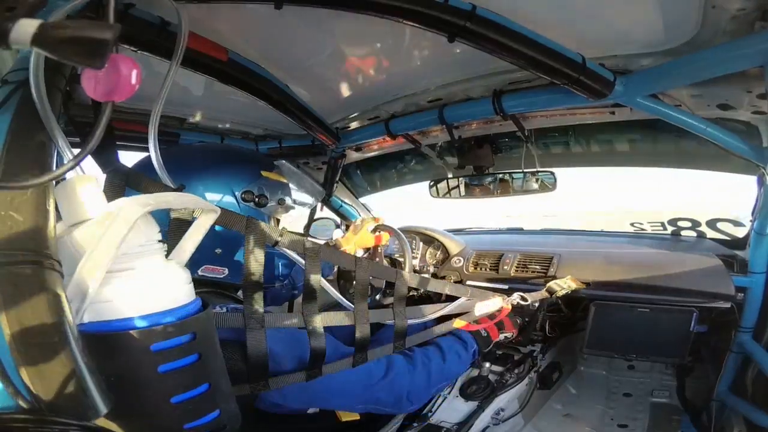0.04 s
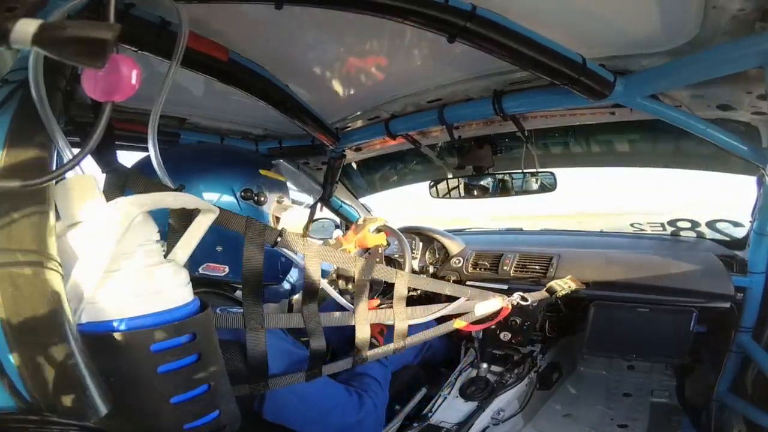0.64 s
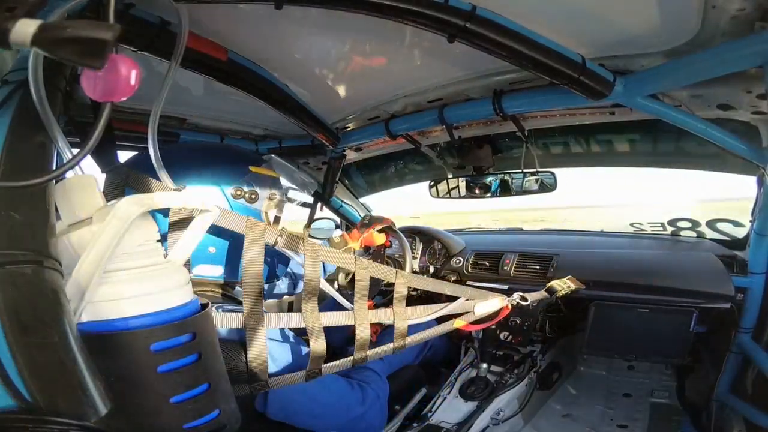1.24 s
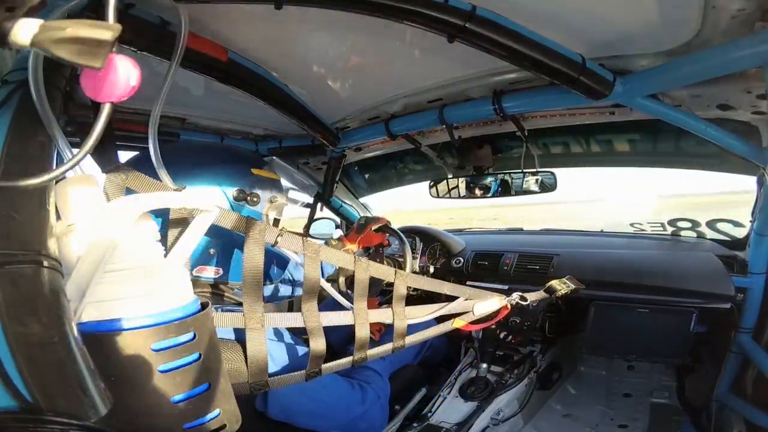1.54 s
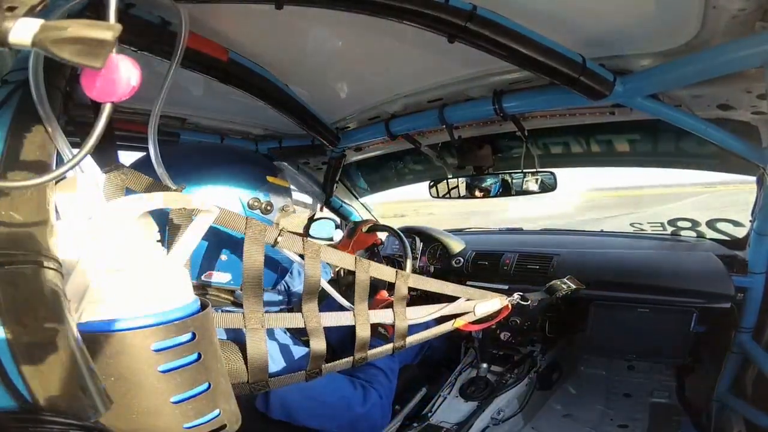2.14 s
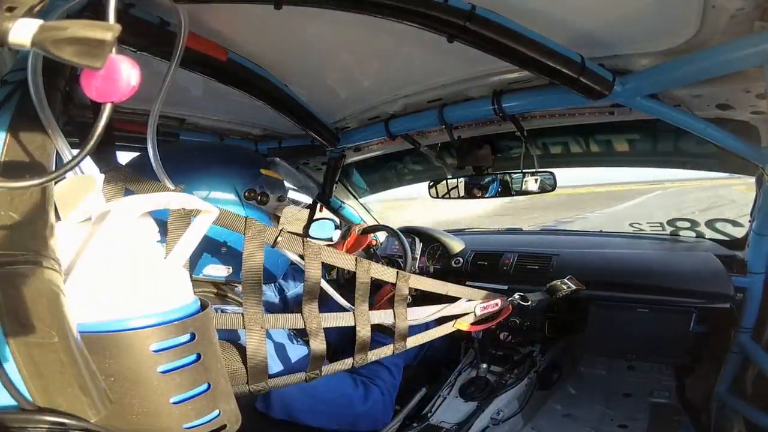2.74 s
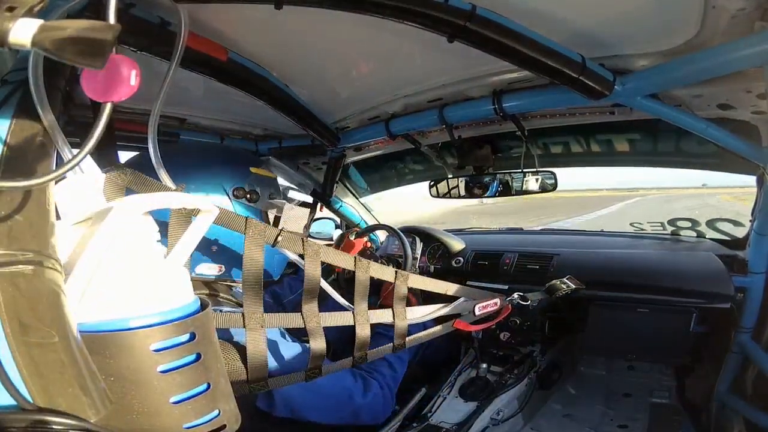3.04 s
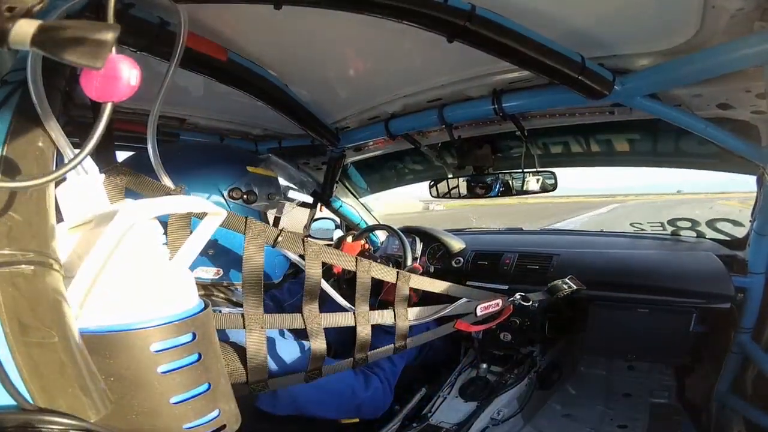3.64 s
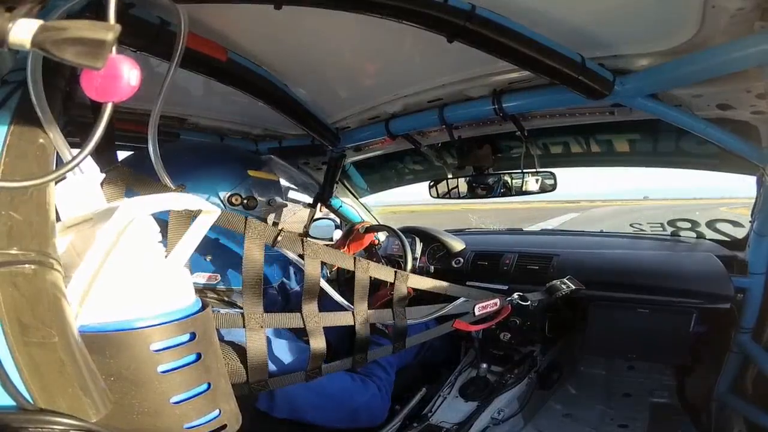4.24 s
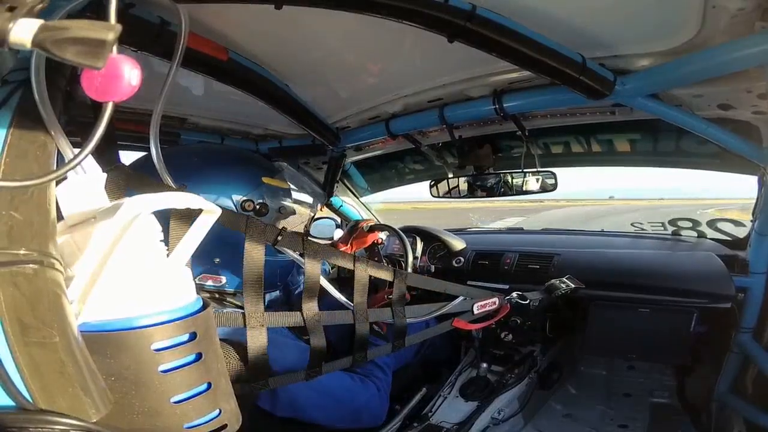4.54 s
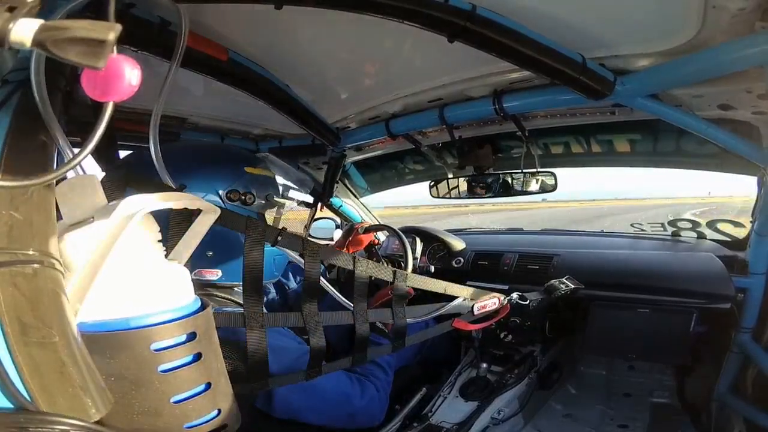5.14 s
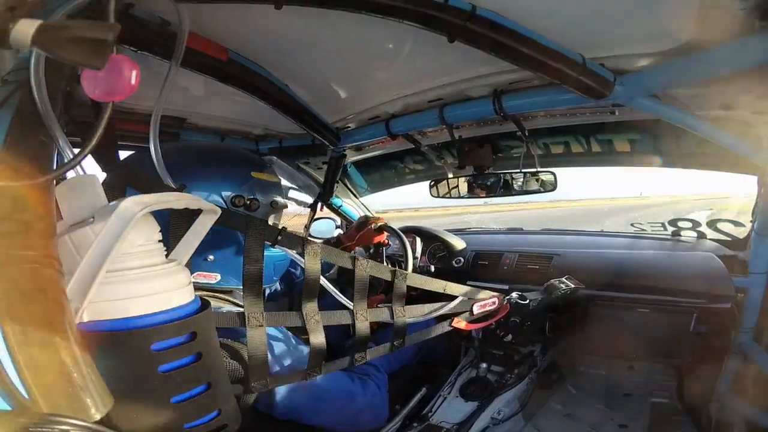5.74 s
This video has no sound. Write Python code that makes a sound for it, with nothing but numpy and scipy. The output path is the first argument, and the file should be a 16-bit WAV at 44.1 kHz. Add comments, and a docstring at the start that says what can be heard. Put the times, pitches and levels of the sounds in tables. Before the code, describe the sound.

Inside a bare race car cockpit, the engine changes up, climbs steadily and briefly eases off amid tyre and wind roar.

```python
"""A six-cylinder race engine from inside the car's bare cockpit: an upshift, a long pull, a brief lift.
Its orders swell as they climb through the resonances of the shell; late on, a low drone throbs with them.
All around are the roar of tyres and air, mechanical rasp, thin hiss and the rumble of the chassis.
At this close range the din overloads the camera's two microphones, which flatten every large wave."""
import sys
import numpy as np
from scipy import signal
from scipy.fft import rfft, irfft
from scipy.io import wavfile

SR = 44100
rng = np.random.default_rng(int(sys.argv[2]) if len(sys.argv) > 2 else 0)


def unload_audio(sound):
    """Save the sound as a 16-bit wav file, at the path given as the first command line argument."""
    columns = np.transpose(np.atleast_2d(sound))
    # keep every value between -1 and 1, then stretch to whole-number steps
    steps = np.round(np.clip(columns, -1, 1) * 32767)
    wavfile.write(sys.argv[1], SR, steps.astype(np.int16))


N = 255339
TIME = np.arange(N) / SR
BINS = np.fft.rfftfreq(N, 1 / SR)

# firing rate through the upshift, the pull and the lift: t/s, f/Hz
FIRING_RATE = [(0.0, 199.5), (0.1, 199.8), (0.2, 181.4), (0.25, 135.7), (0.35, 174.7), (0.43, 152.1),
               (0.65, 163.6), (1.12, 174.5), (1.55, 189.8), (1.8, 192.6), (2.27, 209.3), (3.4, 245),
               (4.0, 262.5), (4.3, 266.6), (4.76, 259.6), (4.95, 273), (5.15, 271.6), (5.79, 283.2)]
# driver off the throttle: start/s, end/s, change of the firing tone/dB
THROTTLE_LIFTS = [(-0.2, 0.23, -3.5), (4.344, 4.896, 10.5)]
# brief dips of the firing tone: t/s, depth/dB, half width/s
FIRING_DIPS = [(0.07, 7, 0.039), (0.216, 3, 0.0028), (0.242, 16, 0.007), (1.757, 21, 0.036)]
# cabin booms that the lowest exhaust tones climb through: f/Hz, level/dB, half width/Hz
CABIN_BOOMS = [(160, -6.5, 24), (186, -9, 9), (207, -2, 12.5), (236, -12.3, 15), (284, -16, 12),
               (343, -22, 14), (362, -14, 11), (383, -10, 11), (499, -19.5, 10), (527, -18.5, 13),
               (547, -19.5, 9), (670, -10, 16), (774, -9, 9)]
# resonances of the shell around the microphones: f/Hz, width/Hz, level/dB
SHELL_MODES = [(92.4, 12, -13), (160, 20.5, 7.5), (208.5, 37, 8), (268, 12, 11), (367.2, 85, -1.5),
               (536, 32, -3), (622, 70, -2.5), (760, 59, -4.5), (1017, 82, -13), (1353, 32, -9.5)]
# what the panels pass between resonances: f/Hz, level/dB
PANEL_GAIN = [(35, -30), (120, -31), (300, -13.5), (800, -9), (1400, -21.5), (2200, -45), (3500, -39)]
# noise spectra inside the cockpit: f/Hz, relative level/dB
ROAR_SPECTRUM = [(20, -10), (60, -13), (110, -13), (170, 7), (240, 4), (330, 5.5), (450, -1.5), (650, -1.5),
                 (900, -2.5), (1300, -8.5), (1900, -25), (3000, -24.5), (6000, -52)]
RASP_SPECTRUM = [(400, -5.5), (1200, 4), (1900, -4.5), (2700, -9.5), (4000, -10), (5500, -15.5),
                 (8000, -22), (15000, -56)]
HISS_SPECTRUM = [(1500, -38), (4000, -6), (6500, -1), (9000, 0), (12000, -4), (15000, -5)]
RUMBLE_SPECTRUM = [(8, 23), (30, -19), (55, -5), (90, -24), (200, -36.5)]
# course of the hiss: t/s, level/dB
HISS_LEVEL = [(0, -54), (0.5, -48.5), (1.05, -44), (1.85, -44.5), (2.1, -52), (2.4, -49.5), (2.65, -45),
              (3.15, -42), (4.15, -46.5), (4.45, -50), (4.85, -47.5), (5.3, -44), (5.79, -45.5)]
# short spits of hiss: t/s, level/dB, half width/s
HISS_SPITS = [(0.205, -47, 0.021), (0.609, -41, 0.031), (0.613, -41, 0.0046)]
# drivetrain knocks in the upshift: t/s, boost of the roar/dB, half width/s
SHIFT_CLUNKS = [(0.284, 2, 0.013), (0.354, 6, 0.022)]
# jolts of the chassis: t/s, level/dB, half width/s
CHASSIS_JOLTS = [(0.307, -29, 0.12), (1.856, -31, 0.082)]
# likeness of the noise at the two microphones: f/Hz, correlation (clipped to 0..1 in use)
MIC_LIKENESS = [(30, -1.5), (150, 0.52), (500, 2.5), (1000, 0.1), (2000, 0.9), (4000, 0.5), (12000, -0.5)]
# phase lead of the left microphone: f/Hz, lead/rad
MIC_LEAD = [(100, 0.27), (215, -0.071), (270, 0.2), (380, 0.3), (530, 0.65), (780, 0.49), (1100, -1.38),
            (2000, -1.12)]
# left microphone over right: f/Hz, level/dB
MIC_BALANCE = [(60, 7), (99, -3.5), (160, 0.5), (270, -1), (450, 1), (740, 2), (1220, 2), (2010, -7.5),
               (3330, -1.5), (5500, -2.5), (9080, -5), (15000, -11.5)]

# how layers follow the engine: base level/dB, slope/(dB per octave of revs), when harsh/dB, off throttle/dB
OVERTONES = (-25.5, 1.5, -1, -1)
BANKS = (-24, -7, 4, -8)
UNEVEN = (-26, 6.5, 3.5, -0.5)
CRANK_BOOM = (-47, -2, 15, 6)
ROAD_ROAR = (-21, -1, -0.5, 2.5)
ENGINE_RASP = (-34, 5.5, -2.1, 0.5)
# revs at which layers sink or swell: firing rate/Hz, change/dB, half width/Hz
SWEET_SPOT = (205.4, -6.5, 8.4)  # the engine runs smoothest here
BANKS_PEAK = (245.2, 6.13, 10)
UNEVEN_PEAK = (233.3, 5.8, 9.6)
CRANK_PEAK = (236, 7.77, 6.6)

CYLINDERS, MID_REVS_HZ = 6, 210  # mid revs as a firing rate


def amp(db):
    """Decibels to gain."""
    return 10 ** (np.asarray(db) / 20)


def unit(x):
    """Scales to rms 1."""
    return x / np.sqrt(np.mean(x ** 2) + 1e-20)


def hump(x, centre, half_width):
    """A bell of height 1."""
    return np.exp(-((x - centre) / half_width) ** 2)


def rise(x, centre, width):
    """A smooth step from 0 to 1."""
    return .5 + .5 * np.tanh((x - centre) / width / 2)


def over_time(table):
    """A time table, sample by sample."""
    return np.interp(TIME, *np.transpose(table))


def at_pitch(table, hz):
    """A spectrum table read on a log-frequency axis."""
    f, value = np.transpose(table)
    return np.interp(np.log(hz + 1), np.log(f), value)


def wander(rate_hz, step=64):
    """Random drift of rms 1, mostly slower than rate_hz."""
    count = N // step + 2
    hz = np.fft.rfftfreq(count, step / SR)
    slow = irfft(rfft(rng.standard_normal(count)) / (1 + (hz / rate_hz) ** 4), count)
    return np.interp(TIME, np.arange(count) * step / SR, unit(slow))


def flutter(depth, rate_hz):
    """Complex gain that makes a tone waver in level and phase."""
    return 1 + depth * (wander(rate_hz) + 1j * wander(rate_hz))


def mic_pair(hz):
    """Complex gain at the left and right microphone."""
    left = amp(at_pitch(MIC_BALANCE, hz) / 2) * np.exp(.5j * at_pitch(MIC_LEAD, hz))
    return np.array([left, 1 / left])


def diffuse_noise(spectrum):
    """Noise from all round the microphones: largely alike in the mids, unrelated at the extremes."""
    common, separate = rfft(rng.standard_normal((2, N)))
    likeness = np.clip(at_pitch(MIC_LIKENESS, BINS), 0, 1)
    pair = np.array([common, likeness * common + np.sqrt(1 - likeness ** 2) * separate])
    sound = irfft(pair * mic_pair(BINS) * amp(at_pitch(spectrum, BINS)), N)
    return sound / np.std(sound.mean(0))


def off_throttle(start, end, pedal_s=0.016):
    """1 while the pedal is up."""
    return rise(TIME, start, pedal_s) - rise(TIME, end, pedal_s)


def rev_bump(bump, firing_hz):
    """Decibels gained or lost around one engine speed."""
    hz, db, half_width = bump
    return db * hump(firing_hz, hz, half_width)


def layer_db(law, firing_hz, lifted, harsh_hz=213.1, harsh_span_hz=1.58):
    """A layer's level from revs and throttle; just above its sweet spot the engine turns harsh."""
    base_db, slope_db, harsh_db, lift_db = law
    harsh = rise(firing_hz, harsh_hz, harsh_span_hz)
    revs_db = slope_db * np.log2(firing_hz / MID_REVS_HZ) + rev_bump(SWEET_SPOT, firing_hz)
    return base_db + revs_db + harsh_db * harsh + lift_db * lifted


def shell(hz):
    """Gain from engine to cockpit: resonances plus what the panels pass between them."""
    peaks = sum(amp(db) ** 2 / (1 + (2 * (hz - f) / width) ** 2) ** 2 for f, width, db in SHELL_MODES)
    return np.sqrt(peaks + amp(at_pitch(PANEL_GAIN, hz)) ** 2)


def cabin_boom(hz, floor_db=-37.5):
    """Gain with which an exhaust tone of this pitch booms in the cabin."""
    return amp(floor_db) + sum(amp(db) * hump(hz, f, width) for f, db, width in CABIN_BOOMS)


def orders(multiples, cycle_hz, cycles, rough, flutter_hz, scatter=1, lag=0):
    """Multiples of the engine cycle, weighted by the shell, fluttering as the burns vary; rms near 1."""
    grid_hz = np.arange(0, 4000, 2.)
    shell_gain, mics = shell(grid_hz), mic_pair(grid_hz)
    sound, power = np.zeros((2, N)), 0
    for k in multiples:
        gain = np.interp(k * cycle_hz, grid_hz, shell_gain)
        envelope = gain * flutter(rough, flutter_hz)
        phase = 2 * np.pi * (k * cycles - lag + scatter * rng.random())
        tone = envelope * np.exp(1j * phase)
        sound += [(tone * np.interp(k * cycle_hz, grid_hz, mic)).imag for mic in mics]
        power = power + gain ** 2 * (.5 + rough ** 2)
    return sound / np.sqrt(power)


def exhaust(firing_hz, cycles, lifted, lift_db=-10, third_db=-10):
    """Six firings a cycle make a steep-fronted wave; its octave and third harmonic need an open throttle."""
    def harmonic(n, **tone):
        """One multiple of the firing rate, booming in the cabin."""
        wave = orders([n * CYLINDERS], firing_hz / CYLINDERS, cycles, scatter=0, **tone)
        return cabin_boom(n * firing_hz) * wave

    overrun_db = sum(db * off_throttle(start, end) for start, end, db in THROTTLE_LIFTS)
    dip_db = sum(db * hump(TIME, t, width) for t, db, width in FIRING_DIPS)
    firing_tone = amp(overrun_db - dip_db) * harmonic(1, rough=0.05, flutter_hz=57)
    octave = harmonic(2, rough=0.15, flutter_hz=9, lag=0.067)
    third = amp(third_db) * harmonic(3, rough=0.12, flutter_hz=8)
    return firing_tone + amp(lift_db * lifted) * (octave + third)


def engine_growl(firing_hz, cycles, lifted):
    """Upper firing harmonics; unlike banks and cylinders fill in the orders between."""
    cycle_hz = firing_hz / CYLINDERS
    k = np.arange(1, CYLINDERS * 10 + 1)
    overtone_orders = k[k % CYLINDERS == 0][2:]
    bank_orders = k[k % CYLINDERS == CYLINDERS // 2]
    uneven_orders = k[(k % (CYLINDERS // 2) > 0) & (k < CYLINDERS ** 2)]
    overtones = orders(overtone_orders, cycle_hz, cycles, rough=0.25, flutter_hz=9)
    banks = orders(bank_orders, cycle_hz, cycles, rough=0.2, flutter_hz=10)
    uneven = orders(uneven_orders, cycle_hz, cycles, rough=0.39, flutter_hz=13)
    overtones_db = layer_db(OVERTONES, firing_hz, lifted)
    banks_db = layer_db(BANKS, firing_hz, lifted) + rev_bump(BANKS_PEAK, firing_hz)
    uneven_db = layer_db(UNEVEN, firing_hz, lifted) + rev_bump(UNEVEN_PEAK, firing_hz)
    return amp(overtones_db) * overtones + amp(banks_db) * banks + amp(uneven_db) * uneven


def chassis(firing_hz, cycles, lifted, rumble_db=-37, db_per_octave=-14.5):
    """The crankshaft, turning twice a cycle, shakes the body; jolts come in the upshift and the pull."""
    boom = orders([2], firing_hz / CYLINDERS, cycles, rough=0.26, flutter_hz=11)
    boom_db = layer_db(CRANK_BOOM, firing_hz, lifted) + rev_bump(CRANK_PEAK, firing_hz)
    rumble = amp(rumble_db + db_per_octave * np.log2(firing_hz / MID_REVS_HZ))
    jolts = sum(amp(db) * hump(TIME, t, width) for t, db, width in CHASSIS_JOLTS)
    return amp(boom_db) * boom + (rumble + jolts) * diffuse_noise(RUMBLE_SPECTRUM)


def road_roar(firing_hz, lifted, gust_db=0.3):
    """Tyres and air just outside roar through the shell, which also clatters as the clutch bites."""
    roar_db = layer_db(ROAD_ROAR, firing_hz, lifted) + gust_db * wander(3.7)
    clatter_db = sum(db * hump(TIME, t, width) for t, db, width in SHIFT_CLUNKS)
    return amp(roar_db + clatter_db) * diffuse_noise(ROAR_SPECTRUM)


def rasp(firing_hz, cycles, lifted, pulsing=0.028, shake_db=0.95):
    """Mechanical noise that pulses faintly with every firing."""
    rasp_db = layer_db(ENGINE_RASP, firing_hz, lifted) + shake_db * wander(60)
    pulse = 1 + pulsing * np.cos(2 * np.pi * CYLINDERS * cycles)
    return amp(rasp_db) * pulse * diffuse_noise(RASP_SPECTRUM)


def hiss(flicker_db=0.5, drift_db=1.14):
    """Thin flickering hiss, stronger at the right microphone, with a few short spits."""
    hiss_db = over_time(HISS_LEVEL) + flicker_db * wander(90) + drift_db * wander(12)
    spits = sum(amp(db) * hump(TIME, t, width) for t, db, width in HISS_SPITS)
    return (amp(hiss_db) + spits) * diffuse_noise(HISS_SPECTRUM)


def drone(lifted, entry_s=4.05, fade_s=0.24, level_db=-22.5, lift_db=3):
    """A nearly steady boom fades in, dead centre, just under the firing tone: together they throb."""
    hz = 243.8 + 3.0 * (TIME - entry_s)  # creeps up 3 Hz a second
    gain = amp(level_db + lift_db * lifted) * rise(TIME, entry_s, fade_s)
    tone = flutter(depth=0.35, rate_hz=6) * np.exp(2j * np.pi * np.cumsum(hz) / SR)
    return gain * unit(tone.imag)


def swell_and_lull(break_s=4.742, swell_db=5, swell_s=0.1, lull_db=-6, lull_s=0.11):
    """Two gains: a swell that breaks off sharply, and the brief lull after it."""
    after = rise(TIME, break_s, 0.0041)
    swell = amp((1 - after) * swell_db * hump(TIME, break_s, swell_s))
    lull = amp(after * lull_db * hump(TIME, break_s, lull_s))
    return swell, lull


def scene(speed_jitter=0.00072):
    """The cockpit at the microphone position, timed by the crankshaft and driven by revs and throttle."""
    firing_hz = over_time(FIRING_RATE) * (1 + speed_jitter * wander(30))
    cycles = np.cumsum(firing_hz / CYLINDERS) / SR
    lifted = sum(off_throttle(start, end) for start, end, _ in THROTTLE_LIFTS)
    engine = exhaust(firing_hz, cycles, lifted) + engine_growl(firing_hz, cycles, lifted)
    body = chassis(firing_hz, cycles, lifted) + drone(lifted)
    noise = road_roar(firing_hz, lifted) + rasp(firing_hz, cycles, lifted) + hiss()
    swell, lull = swell_and_lull()
    return lull * (engine + body + swell * noise)


def record(dry, ceiling_db=-10.5, knee=10, leak=0.035, sense_hz=2600, low_cut_hz=4, high_cut_hz=15400):
    """The microphones overload: large low waves square off and duck the treble; then the band limits."""
    lows = irfft(rfft(dry) / (1 + (BINS / sense_hz) ** 4), N)
    gain = (1 + abs(lows / amp(ceiling_db)) ** knee) ** (-1 / knee)
    limited = dry * (leak + (1 - leak) * gain)
    centred = signal.lfilter(*signal.butter(1, low_cut_hz, "high", fs=SR), limited)
    high_cut = signal.firwin(511, high_cut_hz, window=("kaiser", 9), fs=SR)
    return signal.oaconvolve(centred, high_cut[None], "same")


dry = scene()
out = record(dry)
unload_audio(out)
```